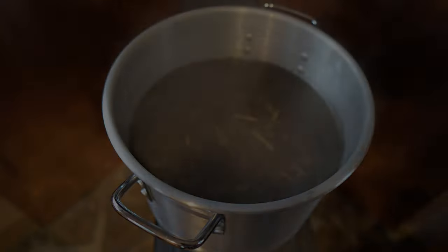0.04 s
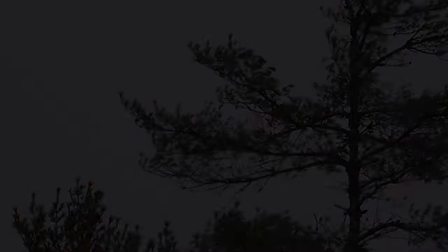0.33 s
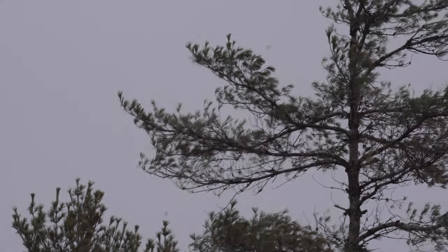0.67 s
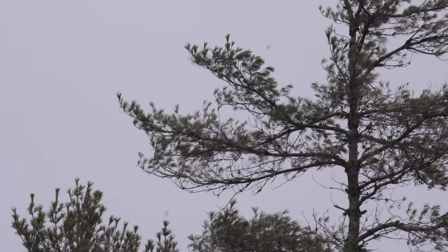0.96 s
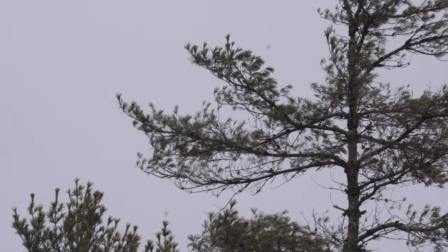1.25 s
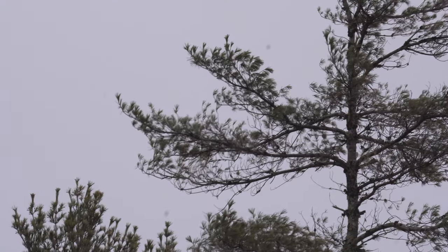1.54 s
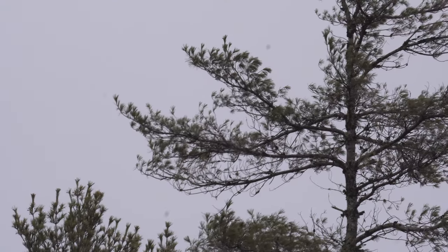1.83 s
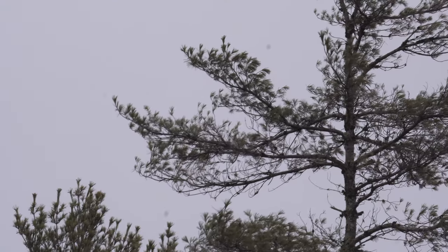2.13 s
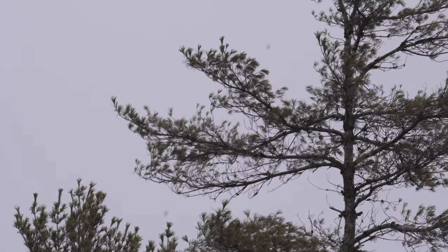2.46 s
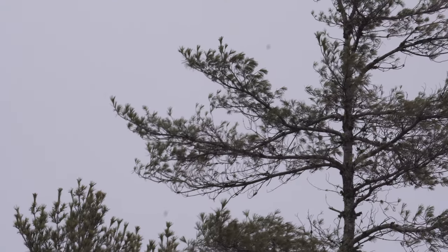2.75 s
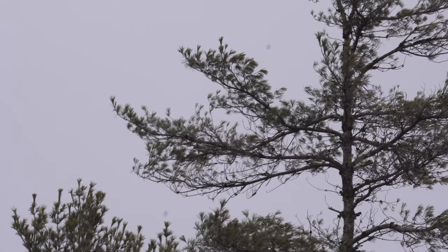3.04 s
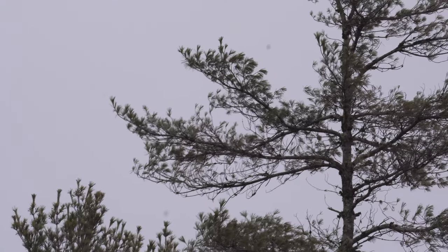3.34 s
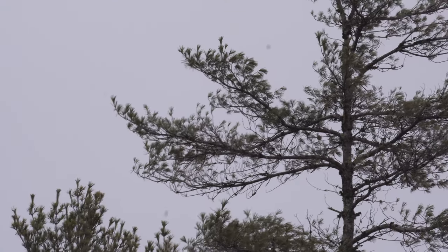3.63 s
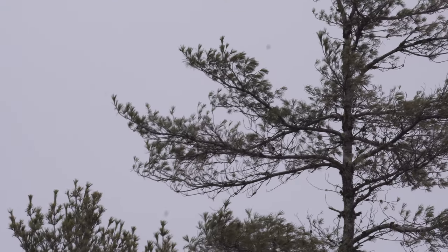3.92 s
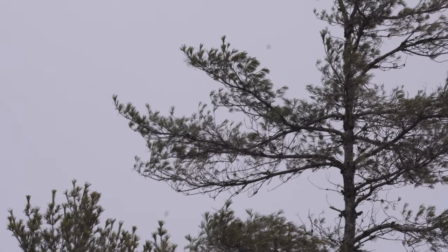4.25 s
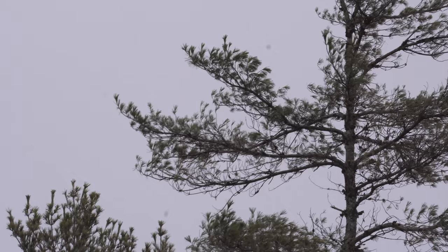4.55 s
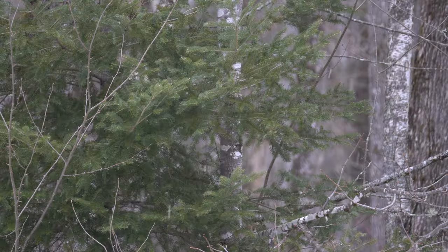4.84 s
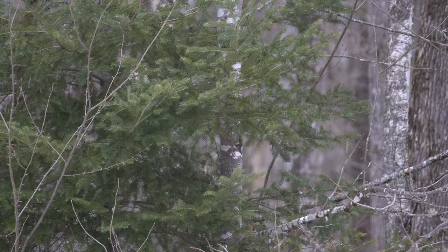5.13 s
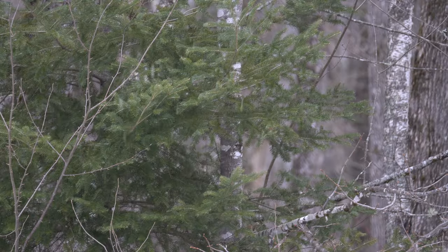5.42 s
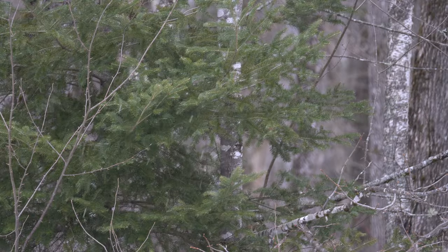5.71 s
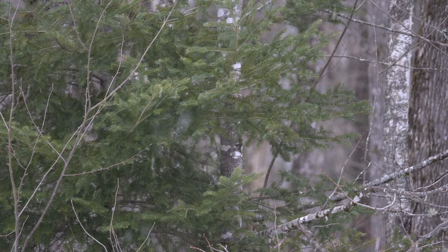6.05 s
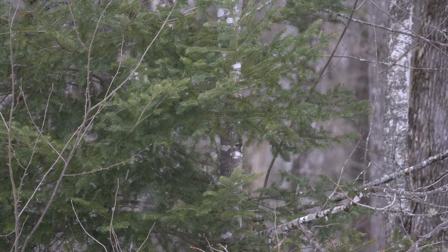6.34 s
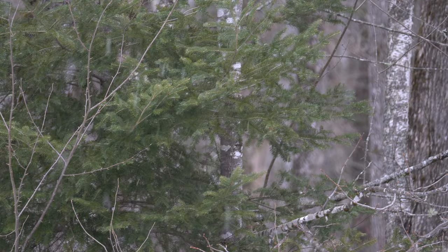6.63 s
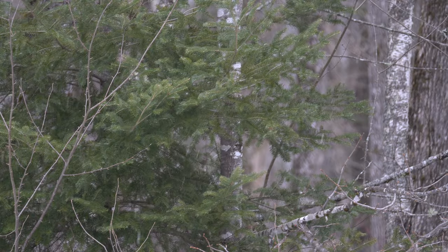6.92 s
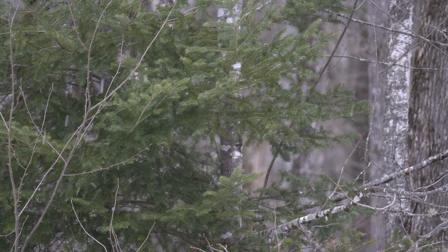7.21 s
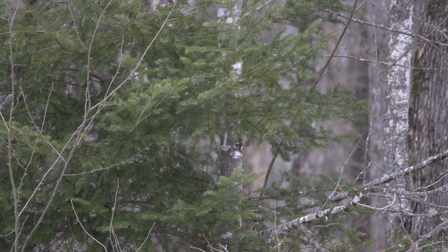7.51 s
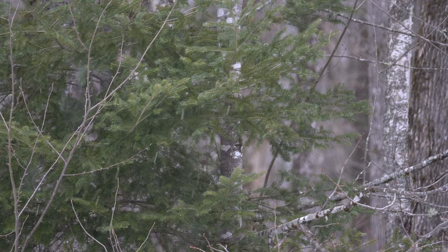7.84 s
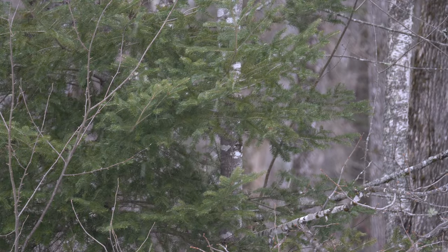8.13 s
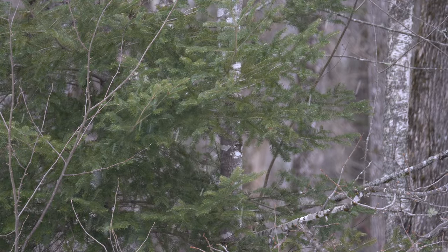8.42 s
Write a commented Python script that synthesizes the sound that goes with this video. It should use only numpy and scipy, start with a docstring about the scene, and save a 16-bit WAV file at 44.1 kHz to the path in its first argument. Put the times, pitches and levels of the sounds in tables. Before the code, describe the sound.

Low wind gusts buffet the microphone over a soft, steady hiss of snow and forest breeze, after a brief, faint simmer.

```python
"""Simmering pot, then gusty winter forest

A faint simmer cuts to a forest: icy snow hisses on needles and dry leaves, wind sighs in the pines.
Gusts buffet the microphone with a low rumble; the stronger ones thump and shed fluttering eddies.
One gusty stretch plays twice."""
import sys
import numpy as np
from scipy import signal
from scipy.fft import rfft, irfft, next_fast_len
from scipy.io import wavfile
from scipy.ndimage import uniform_filter1d, map_coordinates

SR = 44100
rng = np.random.default_rng(int(sys.argv[2]) if len(sys.argv) > 2 else 0)


def generate_wav(signal):
    """Clip the signal to [-1, 1] and save it as 16-bit WAV at the path in sys.argv[1]."""
    frames = np.transpose(np.atleast_2d(signal))
    scaled = np.clip(frames, -1, 1) * 32767
    pcm = np.round(scaled).astype(np.int16)
    wavfile.write(sys.argv[1], SR, pcm)


N = 382347

CUT_S, JUMP_DB, JUMP_DECAY_S = 0.3065, -43, 0.02
BREEZE_HEAVE_DB, BREEZE_EDDY_DB, FLUTTER_DB = -57, -66, 2
THUMP_HALF_CYCLES, THUMP_SKEW_RAD = 0.48, 0.8
SNOW_GAIN_DB, PINES_DB = 2, -66
DIP_S, DIP_DEPTH_DB, DIP_HALF_S = 7.256, 5, 0.006
STRETCH_S, REPEAT_S, CROSSFADE_S = 3.143, 4.853, 0.006
AUDIBLE_HZ, TOP_HZ = 21, 15750

# gusts: t/s, half length/s, heave over breeze/dB, eddies over breeze/dB, left-right/dB
GUSTS = [(0.388, 0.069, 15.5, 11, 1), (0.612, 0.1, 9.5, 14, 6), (0.785, 0.16, 10.5, -3, 2),
         (0.97, 0.14, 1, 5, -1), (1.163, 0.061, -4, 6, -1), (1.3, 0.05, 5, 9, -7),
         (1.536, 0.061, 7, -10, 0), (1.617, 0.048, 7, 4, 7), (1.732, 0.066, 8, 9.5, 2),
         (2.18, 0.021, 7, -13, -1), (2.35, 0.067, 5, 5.5, -5), (2.607, 0.12, 4.5, -2, -4),
         (2.723, 0.031, 5, -10, -2), (2.928, 0.087, 5.5, 12.5, 0), (3.135, 0.062, 11, 11, -2),
         (3.232, 0.046, 10.5, 3, 3), (3.357, 0.062, 14, 8, -2.5), (3.46, 0.063, 12.5, 6, -2),
         (3.532, 0.032, 10, 7, -1), (3.588, 0.036, 7.5, 11.5, 0), (3.812, 0.073, 7.5, 11.5, 2),
         (3.962, 0.082, -5, 5, -3), (4.122, 0.055, -7, 10, -8), (4.263, 0.032, 8, 4, 4),
         (4.387, 0.046, 16.5, 2, 2), (4.515, 0.097, 14.5, 12, 7.5), (4.72, 0.05, 15, 14.5, 7),
         (4.818, 0.05, 10.5, 14, 6), (6.58, 0.1, 6.5, 8, 3), (6.706, 0.045, 11, 8, 8),
         (6.834, 0.07, 14.5, 9, -1), (7.088, 0.028, 7.5, 10, -2), (7.153, 0.038, 11, 14, -2),
         (7.233, 0.033, 11.5, 12.5, 6), (7.43, 0.063, 15, 6, 1), (7.544, 0.045, 16.5, 10.5, -2.5),
         (7.634, 0.046, 7, 6, -10), (7.85, 0.089, 7.5, 11, 1), (7.995, 0.05, 12, 3, 3),
         (8.153, 0.054, 11.5, -1, 3), (8.315, 0.053, 8.5, 2, 4), (8.487, 0.055, 5.5, 9, -5),
         (8.635, 0.067, 11.5, 4, -3)]
# sharp puffs, and a click as the repeat begins (4.844 s): t/s, thud level/dB, half length/s, bright edge over
# thud/dB
PUFFS = [(0.628, -69.5, 0.022, -4), (2.96, -53, 0.0068, -17), (3.603, -59, 0.028, -27),
         (3.802, -66, 0.024, -24), (4.244, -63, 0.0082, -2), (4.352, -59, 0.018, -5),
         (4.817, -53.5, 0.016, -19), (4.844, -60.5, 0.011, 1), (6.817, -51.5, 0.018, -14.5),
         (7.073, -68, 0.022, -23), (7.2, -57.5, 0.012, -15), (7.431, -59.5, 0.015, -21),
         (7.555, -65, 0.02, -16), (8.66, -66, 0.016, -10)]
# single strong eddies: t/s, level/dB, f/Hz, left-right/dB
THUMPS = [(0.366, -38.5, 52, 0), (2.956, -46.5, 100, -2), (3.14, -34, 39, 4), (3.357, -28.5, 20, 10),
          (4.388, -34.5, 27, 3), (4.535, -35.5, 24, 0), (4.705, -33.5, 28, 6), (4.738, -48, 108, 3),
          (4.82, -46.5, 160, 1), (6.825, -29, 16.7, 6.5), (7.435, -41, 21, 0), (7.555, -38, 31, -4)]
# swells in the pine needles: t/s, level/dB, half length/s, f/Hz
SIGHS = [(1.1, -76, 0.16, 1570), (4.53, -77.5, 0.24, 1530), (7.938, -83, 0.25, 1580)]
# pot and kitchen resonances: f/Hz, width/Hz, level/dB
POT_MODES = [(78.6, 55, -80.5), (226, 24, -101), (302, 97, -96), (704, 190, -105), (830, 62, -94.5),
             (1230, 89, -113), (3630, 100, -112), (4110, 83, -111)]

# envelopes: t/s, level/dB (snow: before SNOW_GAIN_DB)
SNOW_ENVELOPE = [(0.35, -65.5), (0.58, -65.5), (2.3, -66.5), (3.43, -67.5), (4.72, -66.5), (6.7, -66.4),
                 (7.45, -65.5), (8.6, -66.5)]
FIZZ_ENVELOPE = [(0.35, -75), (0.7, -81), (1.8, -81), (2.5, -100)]
SIMMER_ENVELOPE = [(0, -90), (0.3, -102)]

# noise spectra: f/Hz, relative level/dB
HEAVE_SPECTRUM = [(3, -16), (9, 5.5), (16, 0.5), (25, -5), (40, -9.5), (70, -25.5), (120, -44.5),
                  (300, -54.5), (900, -120)]
EDDY_SPECTRUM = [(30, -15.5), (60, 4), (95, -0.5), (150, -9), (220, -19), (330, -30), (600, -45),
                 (2000, -94)]
THUD_SPECTRUM = [(30, -26), (80, 3), (180, 1.5), (280, -11.5), (400, -27.5), (2000, -66)]
EDGE_SPECTRUM = [(150, 10), (380, 9), (620, -4), (1000, -19), (3000, -46)]
SNOW_SPECTRUM = [(300, -18), (1000, -3), (2200, -1), (3400, 2), (4300, 0.5), (5600, 0.5), (8300, -3),
                 (10700, -4), (13000, -7), (15700, -12)]
FIZZ_SPECTRUM = [(4000, -27), (8000, -10), (11000, -4), (15700, -20)]
PINE_SPECTRUM = [(40, -14), (150, 6), (260, 1.5), (450, -2.5), (800, -1), (1250, -1.5), (1520, 0.3),
                 (1800, -1.5), (3000, -6.5), (6000, -17.5), (16000, -53)]
SIMMER_SPECTRUM = [(400, 1.5), (1500, -4), (4500, -4), (7000, -14), (12000, -33)]

# stereo image: f/Hz, left-right correlation
AMBIENT_CORR = [(200, 0.75), (1300, 0.85), (2400, 0.74), (4400, 0.66), (8100, 0.72), (15000, 0.53)]
HEAVE_CORR, EDDY_CORR = [(20, 0.54), (80, 0.66)], [(60, 0.97), (200, 0.89)]
THUD_CORR, EDGE_CORR = [(100, 0.71)], [(400, 0.8)]


def buffeting():
    """Large eddies heave with each gust; small ones flutter, slightly more at the heave's crests."""
    heave_gain, eddy_gain, lean_db = airflow()
    heave = turbulence(HEAVE_SPECTRUM, HEAVE_CORR, span_s=0.11)
    crests = unit(1 + 0.08 * np.abs(heave.mean(axis=0)))
    flutter = amp(BREEZE_EDDY_DB + FLUTTER_DB * wobble(rate_hz=20))
    eddies = eddy_gain * flutter * crests * turbulence(EDDY_SPECTRUM, EDDY_CORR, span_s=0.17)
    return amp(BREEZE_HEAVE_DB) * heave_gain * heave * pan(lean_db) + eddies


def airflow():
    """Gusts add their power to the breeze. Returns heave gain, eddy gain, heave left-right/dB."""
    _, _, heave_db, eddy_db, side_db = np.transpose(GUSTS)
    surges = np.array([bump(t_s, half_s) for t_s, half_s, *_ in GUSTS]) ** 2
    heave_power = 1 + amp(heave_db) ** 2 @ surges
    eddy_power = 1 + amp(eddy_db) ** 2 @ surges
    lean_db = (side_db * amp(heave_db) ** 2) @ surges / heave_power
    return np.sqrt(heave_power), np.sqrt(eddy_power), lean_db


def turbulence(spectrum, corr, span_s):
    """Stereo pressure noise, its audible part held near rms 1 over each span."""
    pair = stereo(rng.standard_normal((2, N)), spectrum, corr)
    audible = filtered(pair, lambda hz: 1 - 1 / (1 + (hz / AUDIBLE_HZ) ** 8))
    analytic = signal.hilbert(audible, next_fast_len(N))[:, :N]
    power = np.mean(np.abs(analytic) ** 2, axis=0) / 2
    window = np.hanning(int(span_s * SR))
    span_power = signal.fftconvolve(power, window / window.sum(), 'same')
    return pair / np.sqrt(np.abs(span_power) + 0.03 * span_power.mean())


def puffs():
    """Sharp puffs hit the microphone: a low thud with a brighter edge. The row at 4.844 s is a short click
    where the repeated stretch begins."""
    thud_gain = sum(amp(db) * bump(t_s, half_s) for t_s, db, half_s, _ in PUFFS)
    edge_gain = sum(amp(db + edge_db) * bump(t_s, half_s) for t_s, db, half_s, edge_db in PUFFS)
    thuds = thud_gain * turbulence(THUD_SPECTRUM, THUD_CORR, span_s=0.014)
    edges = edge_gain * turbulence(EDGE_SPECTRUM, EDGE_CORR, span_s=0.016)
    return thuds + edges


def thumps():
    """A strong eddy gives one push and pull of pressure, out of step at the two microphone ports."""
    out = np.zeros((2, N))
    for t_s, db, hz, side_db in THUMPS:
        phase = rng.uniform(0, 2 * np.pi) + THUMP_SKEW_RAD * rng.standard_normal((2, 1))
        swing = np.cos(2 * np.pi * hz * since(t_s) + phase)
        out += amp(db) * pan(side_db) * bump(t_s, THUMP_HALF_CYCLES / hz) * swing
    return out


def snow():
    """Far grains merge into hiss; near ones prickle on top."""
    far = stereo(patchy_noise(depth_db=0.79), SNOW_SPECTRUM, AMBIENT_CORR) * pan(-1.46)
    near = amp(-12.5) * ice_grains(count=12000, median_hz=7800, decay_cycles=0.91, scatter_db=7)
    return amp(SNOW_GAIN_DB) * envelope(SNOW_ENVELOPE) * (far + near)


def ice_grains(count, median_hz, decay_cycles, scatter_db):
    """Grains land at random, each a tiny damped ring of its own pitch and size. Mono, rms 1."""
    starts = rng.integers(0, N, (count, 1))
    hz = np.clip(median_hz * np.exp(rng.standard_normal((count, 1)) / 2), 1000, TOP_HZ)
    size = amp(scatter_db * np.minimum(rng.exponential(size=(count, 1)), 4))
    polarity = rng.choice([-1, 1], (count, 1))
    offsets = np.arange(64)
    cycles = hz * offsets / SR
    rings = size * polarity * np.sin(2 * np.pi * cycles) * np.exp(-cycles / decay_cycles)
    return unit(np.bincount((starts + offsets).ravel(), rings.ravel(), N)[:N])


def fizz():
    """Top treble: the hiss starts out brighter."""
    return envelope(FIZZ_ENVELOPE) * stereo(rng.standard_normal((2, N)), FIZZ_SPECTRUM, AMBIENT_CORR)


def pines():
    """Wind in the needles: a steady rush and narrow-band sighs."""
    gain = amp(PINES_DB + 0.1 * wobble(rate_hz=6.7))
    rush = gain * stereo(patchy_noise(depth_db=0.9), PINE_SPECTRUM, AMBIENT_CORR)
    sighs = sum(amp(db) * bump(t_s, half_s) * band(hz, width_hz=92) for t_s, db, half_s, hz in SIGHS)
    return rush * pan(-2.54) + sighs * pan(-2.5)


def pot():
    """Pot and kitchen hum in fuzzy resonances while the simmer fades."""
    hum = sum(amp(db) * band(hz, width_hz) for hz, width_hz, db in POT_MODES)
    simmer = stereo(patchy_noise(depth_db=1.5), SIMMER_SPECTRUM, AMBIENT_CORR)
    return hum + envelope(SIMMER_ENVELOPE) * simmer


def repeated(x):
    """The stretch from STRETCH_S to REPEAT_S plays again at once, cross-faded."""
    length_s = REPEAT_S - STRETCH_S
    inside_s = np.minimum(since(REPEAT_S), length_s - since(REPEAT_S))
    share = np.sin(np.pi / 2 * np.clip(inside_s / CROSSFADE_S + 0.5, 0, 1)) ** 2
    return (1 - share) * x + share * np.roll(x, round(length_s * SR), axis=1)


def patchy_noise(depth_db):
    """Two independent noises with random gain patches in time and frequency."""
    bins = signal.stft(rng.standard_normal((2, N)), nperseg=512)[2]
    patches = uniform_filter1d(rng.standard_normal(bins.shape[1:]), size=9, axis=0)
    patches = uniform_filter1d(patches, size=18, axis=1)
    return signal.istft(bins * amp(depth_db * unit(patches)), nperseg=512)[1][:, :N]


def band(hz, width_hz):
    """Noise in one resonance, rms 1."""
    return unit(filtered(rng.standard_normal(N), lambda f: 1 / (1 + (2 * (f - hz) / width_hz) ** 2)))


def stereo(pair, spectrum, corr):
    """Two independent signals, coloured and mixed to left and right; mid at rms 1."""
    def response(hz):
        angle = np.arccos(along(corr, hz)) / 2
        return amp(along(spectrum, hz)) * [np.cos(angle), np.sin(angle)]
    mid, side = filtered(pair, response)
    return np.array([mid + side, mid - side]) / np.std(mid)


def filtered(x, response):
    """FFT filter with gain response(hz)."""
    size = next_fast_len(N + SR // 2)
    return irfft(rfft(x, size) * response(np.fft.rfftfreq(size, 1 / SR)), size)[..., :N]


def along(points, hz):
    """(f/Hz, value) points read on a log axis."""
    knots_hz, values = np.transpose(points)
    return np.interp(np.log(hz + 1), np.log(knots_hz + 1), values)


def envelope(points):
    """(t/s, level/dB) points to gain per sample."""
    return amp(np.interp(since(0), *np.transpose(points)))


def wobble(rate_hz):
    """Smooth random curve, rate_hz knots a second."""
    knots = rng.standard_normal(int(N * rate_hz / SR) + 4)
    return map_coordinates(knots, [since(0) * rate_hz])


def bump(t_s, half_s):
    """Bell of height 1 at t_s."""
    return np.exp(-(since(t_s) / half_s) ** 2)


def since(t_s):
    """Seconds from t_s, per sample."""
    return np.arange(N) / SR - t_s


def pan(lean_db):
    """Channel gains for a left-right level difference."""
    return amp(np.array([[1], [-1]]) * lean_db / 2)


def amp(db):
    """dB to gain."""
    return 10 ** (np.asarray(db) / 20)


def unit(x):
    """x at rms 1."""
    return x / np.sqrt(np.mean(x ** 2) + 1e-30)


def scene():
    """Kitchen cuts to forest; the pressure jump is a soft click that sinks into the rumble."""
    kitchen = pot()
    dip = amp(-DIP_DEPTH_DB * bump(DIP_S, DIP_HALF_S))  # the hiss dips briefly
    hiss = (pines() + snow() + fizz()) * dip
    rumble = buffeting() + puffs() + thumps()
    jump = np.exp(-np.abs(since(CUT_S)) / JUMP_DECAY_S)
    forest = repeated(hiss + (1 - jump) * rumble) - amp(JUMP_DB) * jump
    return np.where(since(CUT_S) < 0, kitchen, forest)


def record(dry):
    """Brick-wall low-pass at TOP_HZ."""
    return filtered(dry, lambda hz: hz < TOP_HZ)


dry = scene()
out = record(dry)
generate_wav(out)
```